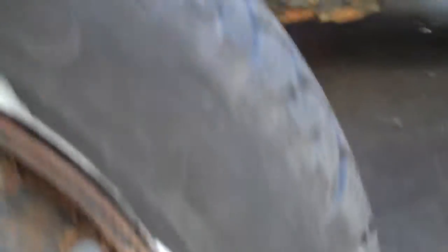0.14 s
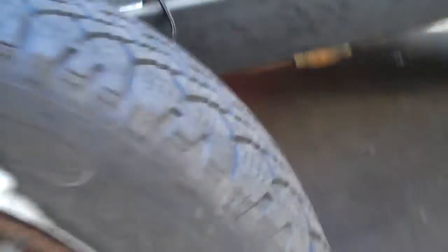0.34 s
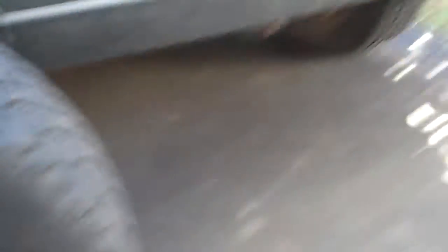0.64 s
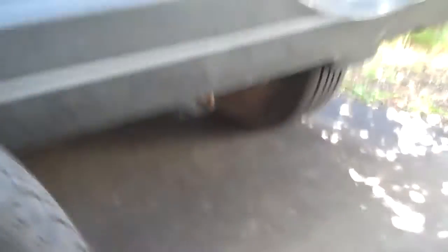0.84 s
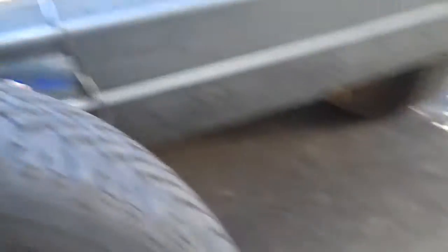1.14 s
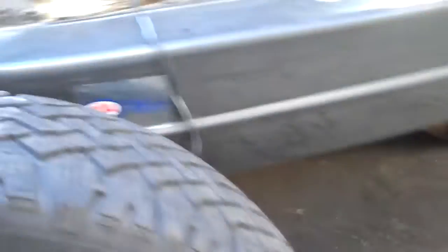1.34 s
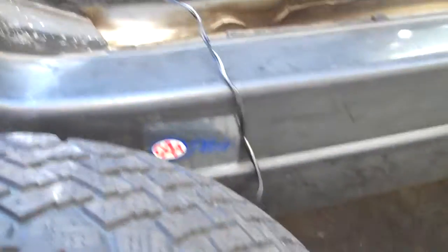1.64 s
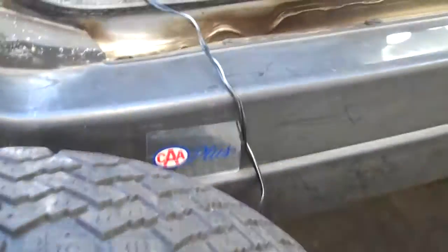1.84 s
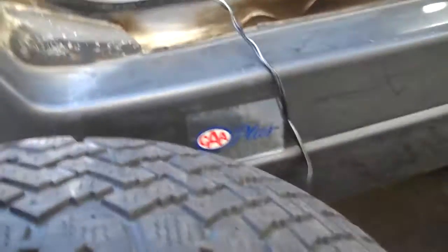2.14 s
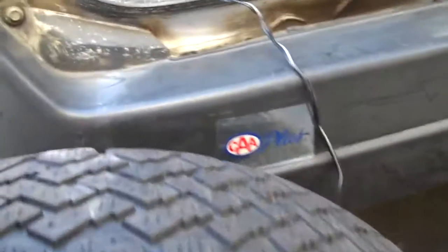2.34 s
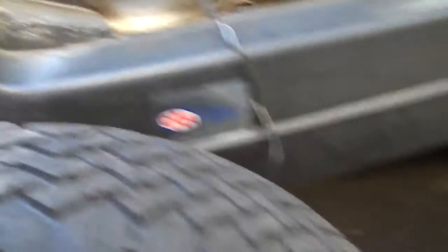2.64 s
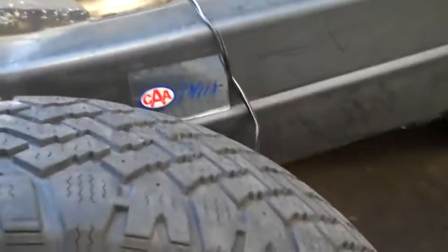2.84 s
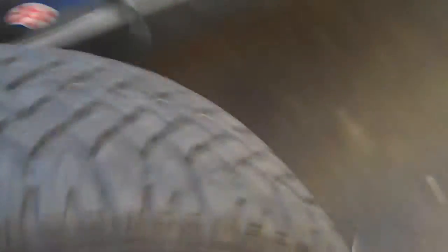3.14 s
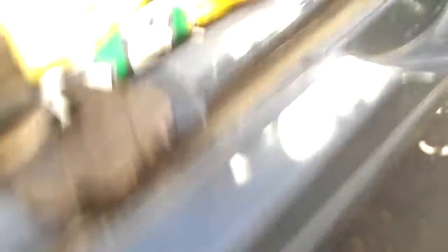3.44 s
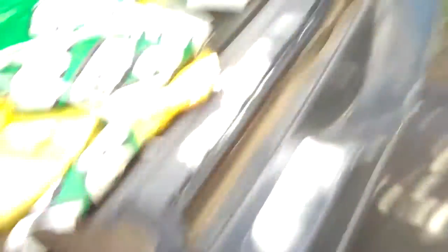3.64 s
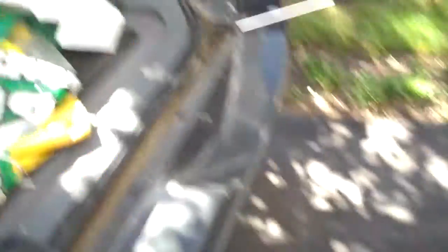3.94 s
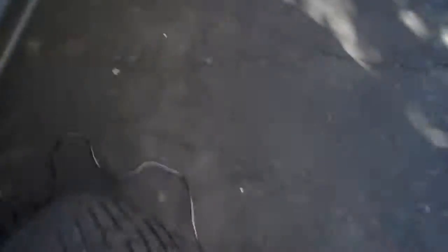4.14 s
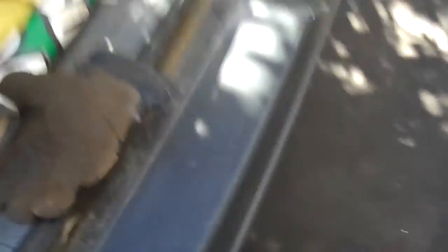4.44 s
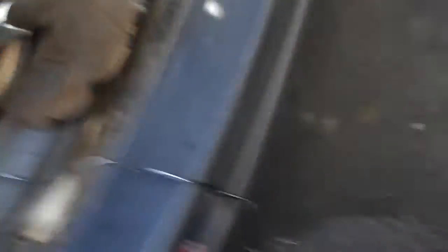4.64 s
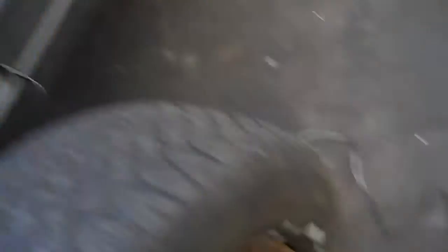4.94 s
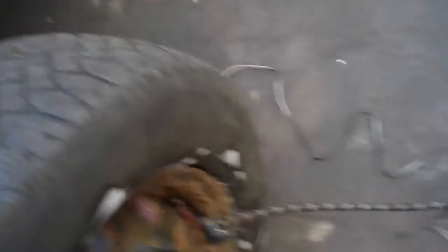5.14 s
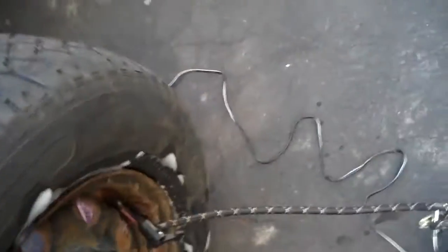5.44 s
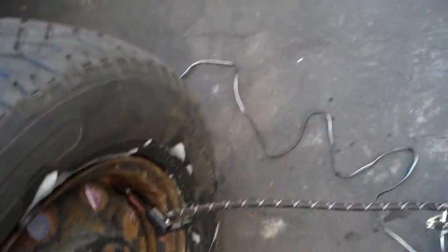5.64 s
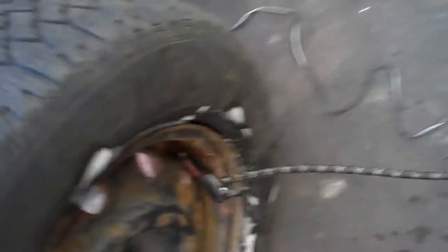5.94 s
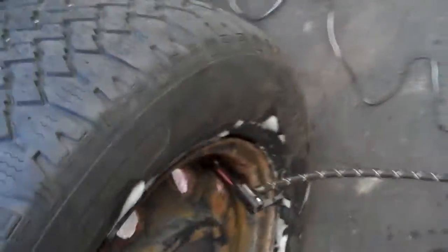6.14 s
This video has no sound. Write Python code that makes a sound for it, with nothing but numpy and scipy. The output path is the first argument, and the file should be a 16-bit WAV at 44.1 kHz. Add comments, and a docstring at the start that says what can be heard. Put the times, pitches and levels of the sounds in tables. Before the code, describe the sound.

A small electric piston compressor is already running at the start, pumping up a tire on the pavement beside a car, and it continues without a break for about six seconds. The piston knocks about 32 times a second, blending into a hard, chattering buzz. A bright, pulsing hiss of air runs with it, along with a metallic rattle, a faint rough whine and a low throb.

The microphone is close and hand-held, moving around the wheel, so these layers swell and fade while the overall loudness stays fairly even. Over the first 1.5 seconds the ring of the metal casing grows. After about 3 seconds the throb gives way to a deeper boom. Near 5 seconds the boom fades and the knocking and casing ring come forward again. The pump is still running at the end, just a touch slower.

```python
"""A small electric piston compressor pumps up a tyre beside a car, about 32 turns a second.
From the start, every turn brings a knock, two puffs of hissing air, a rattle and a throb of the cylinder.
The hand-held microphone wanders around the wheel, so the parts swell and fade and the ground echo shifts.
First the ring of the metal casing grows; after about 3 s the throb gives way to a deeper boom.
Near 5 s the boom fades and the knock and casing swell; the pump runs on to the end, a touch slower."""
import sys
import numpy as np
from scipy import signal
from scipy.fft import rfft, irfft, next_fast_len
from scipy.io import wavfile
from scipy.ndimage import uniform_filter1d, map_coordinates

SR = 44100
rng = np.random.default_rng(int(sys.argv[2]) if len(sys.argv) > 2 else 0)


def bounce(signal):
    """Save signal as a 16-bit WAV file at the path given by the first command-line argument."""
    frames = np.transpose(np.atleast_2d(signal))
    limited = np.clip(frames, -1, 1)
    pcm = np.round(limited * 32767).astype(np.int16)
    wavfile.write(sys.argv[1], SR, pcm)


N = 277830
TIME = np.arange(N) / SR
FFT_SIZE = next_fast_len(N + SR // 2)
HZ = np.maximum(np.fft.rfftfreq(FFT_SIZE, 1 / SR), 1)


# how fast the crank spins: t/s, speed/(turns per s)
CRANK_SPEED = [(0.0, 32.57), (0.5, 32.52), (1.0, 32.35), (2.0, 32.33), (3.0, 32.19), (4.0, 32.09),
               (5.0, 32.01), (5.8, 31.77), (6.3, 32.08)]
def crank(start_turn=.106):
    """The crank drives the piston. Counts its turns; a "place" is a point within one turn, 0 to 1."""
    return start_turn + np.cumsum(in_time(CRANK_SPEED)[0]) / SR


# the piston's knocks: place/turns, fade time/turns, level/dB
PISTON_KNOCKS = [(.11, 0.37, -4), (0.619, 0.026, -13)]
# the notes the cylinder head rings at: f/Hz, width/Hz, level/dB
HEAD_NOTES = [(1045, 130, -13.5), (1102, 85, 10.5), (1230, 14, 3)]
# the knock along the microphone's path: t/s, level/dB
KNOCK_LEVEL = [(0.0, -24), (0.39, -21), (0.57, -23.5), (0.9, -20), (1.47, -27.5), (1.83, -23.5),
               (2.19, -27), (2.43, -23.5), (2.94, -24.5), (3.06, -28), (3.33, -23.0), (3.872, -26.5),
               (4.83, -21), (4.98, -24.5), (5.88, -25.5), (6.3, -21.5)]
def knock(turns):
    """The piston knocks as it pushes against the air, and the cylinder head rings."""
    blows = contacts(turns, PISTON_KNOCKS, repeat=0.47, chatter_db=-2, jitter_ms=0.12, between=0.076)
    return gain_curve(KNOCK_LEVEL) * evened(band(resonate(blows, HEAD_NOTES), 1037, 1430))


# the two puffs through the valves: place/turns, fade time/turns, level/dB
AIR_JETS = [(.16, 0.47, -0.49), (.71, 0.5, -0.22)]
# the hiss from low to high pitch: f/Hz, level/dB
HISS_COLOUR = [(30, -43), (80, -28), (600, -25.5), (1500, 1), (2700, 2), (3050, -3), (3350, 0),
               (3650, -2.5), (4200, 1.5), (5000, 0), (5900, 2), (6800, -4.5), (7750, 1.5), (9300, -10),
               (11300, -20.5), (14000, -19)]
# the notes of the whistle: f/Hz, width/Hz, level/dB
WHISTLE_NOTES = [(4133, 130, 26), (6140, 390, -25.5)]
# the hiss along the microphone's path: t/s, level/dB
HISS_LEVEL = [(0.0, -21.5), (0.27, -20), (0.54, -23), (0.69, -20.5), (1.86, -20.5), (1.98, -21.0),
              (3.54, -21.0), (3.84, -19.5), (5.67, -20.5), (6.3, -19)]
def hiss(turns):
    """Air tears through the valves on both strokes and whistles faintly; left and right differ."""
    air = rng.standard_normal((2, N)) * bursts(turns, AIR_JETS, rise=0.017, between=0.45, uneven_db=1.4)
    rush, whistle = coloured(air, HISS_COLOUR), resonate(air, WHISTLE_NOTES)
    whistle_db = -22.5 + 1.1 * swing(CYLINDER_LEVEL)  # compared with the rush; swells with the boom
    shared, side = rush / rush.std() + from_db(whistle_db) * whistle / whistle.std()
    side = filtered(side, side_gain())
    return gain_curve(HISS_LEVEL) * np.array([swirled(shared + side), swirled(shared - side)])


# the jolts of the drive: place/turns, fade time/turns, level/dB
DRIVE_JOLTS = [(.26, 0.15, -10), (.71, 0.28, -10)]
# the notes the drive and its cover ring at: f/Hz, width/Hz, level/dB
DRIVE_NOTES = [(1830, 33, 6), (2049, 38, 6.5), (2115, 25, 6.5)]
COVER_NOTES = [(2286, 56, 10), (2660, 250, -7)]
# the drive's ring along the microphone's path: t/s, level/dB
RATTLE_LEVEL = [(0.0, -26.5), (0.33, -21.5), (0.54, -35), (0.84, -23), (1.47, -30.5), (1.95, -24.5),
                (2.55, -25.5), (2.94, -37), (3.12, -25), (3.3, -29), (4.05, -23), (4.32, -29),
                (5.04, -23.5), (5.88, -30), (6.12, -22), (6.3, -24)]
def rattle(turns):
    """The drive rattles whenever push turns to pull; it rings and shakes the thin cover."""
    blows = contacts(turns, DRIVE_JOLTS, repeat=1.0, chatter_db=-1.5, jitter_ms=0.052, between=0.048)
    ring = evened(band(resonate(blows, DRIVE_NOTES), 1940, 2250))
    cover = evened(band(resonate(blows, COVER_NOTES), 2204, 2620))
    cover_db = -29 + 0.23 * swing(RATTLE_LEVEL) - 0.52 * swing(HOUSING_LEVEL)
    return gain_curve(RATTLE_LEVEL) * ring + from_db(cover_db) * cover


# the blows on the casing: place/turns, fade time/turns, level/dB
CASING_BLOWS = [(.13, 0.24, 3.5), (0.701, 0.23, -1)]
# the notes the casing rings at: f/Hz, width/Hz, level/dB
CASING_NOTES = [(1659, 58, 0.5), (1734, 56, -2), (1764, 16, -2)]
# the casing along the microphone's path: t/s, level/dB
CASING_LEVEL = [(0.0, -42), (1.38, -23.5), (3.36, -28.5), (3.54, -34), (3.99, -27), (4.11, -34),
                (4.83, -23), (5.25, -25.0), (6.3, -26)]
def casing(turns):
    """The piston's strokes set the metal casing ringing."""
    blows = contacts(turns, CASING_BLOWS, repeat=0.6, chatter_db=-3, jitter_ms=0.072, between=.05)
    return gain_curve(CASING_LEVEL) * evened(band(resonate(blows, CASING_NOTES), 1430, 1950))


# the whine, dipping at both ends of the piston's travel: place/turns, f/Hz, level/dB
WHINE_PATH = [(0, 1772, 1), (.12, 1466, 1.5), (.21, 1142, -5), (.28, 1558, 7.5), (.36, 2170, -4),
              (.52, 1985, -2), (.68, 1230, -7), (.76, 2140, 2), (.87, 2300, -11)]
# the notes the gears ring at: f/Hz, width/Hz, level/dB
GEAR_NOTES = [(1080, 17, -5.5), (1447, 48, 10.5), (1590, 94, -4.5), (2160, 990, 0)]
def whine(turns, roughness=0.039):
    """A rough whine of the drive swoops down and up as the load comes and goes."""
    place, hz, db = np.transpose(WHINE_PATH)
    hz, db = np.interp(turns, place, hz, period=1), np.interp(turns, place, db, period=1)
    waver = uniform_filter1d(rng.standard_normal(N), size=120)
    phase = 2 * np.pi * np.cumsum(hz * (1 + roughness * waver / waver.std())) / SR
    phase -= phase[np.searchsorted(turns, np.floor(turns))]  # the same gear teeth meet on every turn
    whine_db = -28.5 - .35 * swing(KNOCK_LEVEL)  # louder where the knock is faint
    return from_db(whine_db) * evened(resonate(from_db(db) * np.sin(phase), GEAR_NOTES))


# the two strokes of the piston: place/turns, level/dB
STROKES = [(0.198, 2.5), (0.778, -7)]
# the throb from low to high pitch: f/(average crank speed), level/dB
THROB_COLOUR = [(1, -53), (2, -30.5), (3, -33.5), (4, -28), (5, -20.5), (6, -27), (7, -25), (8, -10.5),
                (9, -11.5), (10, 0.5), (11, -1), (12, 2.5), (13, 3.5), (14, 2.5), (15, -11), (16, -7)]
# a tiny swell in the breath of air: place/turns, fade time/turns, level/dB
BREATH_SWELL = [(.3, .3, -36)]
# the breath from low to high pitch: f/Hz, level/dB
BREATH_COLOUR = [(30, -83), (100, -24), (200, -15.5), (300, 3.5), (420, 12), (560, 3), (700, -18),
                 (1200, -49)]
def throb(turns, uneven=0.047, breath_db=-13):
    """A strong and a weak push of air pass through the pump's body each turn, over a soft breath."""
    pulses = 0
    for place, db in STROKES:
        count, age = np.divmod(turns - place + 1, 1)
        force = 1 + uneven * rng.standard_normal(256)
        pulses = pulses + from_db(db) * force[count.astype(int)] * np.exp(-(age * 400 - 2) ** 2)
    crank_hz = np.mean(np.array(CRANK_SPEED)[:, 1])
    overtones = [(multiple * crank_hz, db) for multiple, db in THROB_COLOUR]
    tone = coloured(pulses, [(10, -65)] + overtones + [(650, -24.0), (1500, -61.5)])
    air = rng.standard_normal(N) * bursts(turns, BREATH_SWELL, rise=.05, between=.5, uneven_db=4)
    return evened(tone) + from_db(breath_db) * evened(coloured(air, BREATH_COLOUR))


# the cylinder along the microphone's path: t/s, boom level/dB, throb level/dB
CYLINDER_LEVEL = [(0.0, -39, -29.5), (1.5, -43.5, -28.5), (2.85, -41.5, -28.5), (3.15, -37.0, -39.5),
                  (3.69, -34.0, -33), (4.44, -35.5, -36.0), (4.8, -41, -32.5), (5.52, -44, -33),
                  (6.3, -40.5, -28.5)]
def cylinder(turns, hum_db=-45.5, hum_top_hz=275, boom_top_hz=368):
    """The cylinder's low hum spreads evenly; the boom and throb above it are loud in different spots."""
    boom_db, throb_db = in_time(CYLINDER_LEVEL)
    pulses = smeared(throb(turns), hz=465.7, width_hz=19.3)
    hum_range = 1 / (1 + (HZ / hum_top_hz) ** 30)
    low_range = 1 / (1 + (HZ / boom_top_hz) ** 40)
    hum = from_db(hum_db) * evened(filtered(pulses, hum_range))
    boom = from_db(boom_db) * evened(filtered(pulses, low_range - hum_range))
    return hum + boom + from_db(throb_db) * evened(filtered(pulses, 1 - low_range))


# the blows on the housing: place/turns, fade time/turns, level/dB
HOUSING_BLOWS = [(.07, 0.14, -2), (0.239, 0.05, -5.5), (0.619, 0.34, -9)]
# the notes the housing drones at: f/Hz, width/Hz, level/dB
HOUSING_NOTES = [(553, 53, -5), (577.7, 28, 1), (685, 154, -10.5), (758, 44, -2), (847, 48, -2.5),
                 (905, 18, -9.5)]
# the drone along the microphone's path: t/s, level/dB
HOUSING_LEVEL = [(0.0, -33.5), (1.68, -29), (3.15, -32), (3.57, -29.5), (4.77, -31.0), (5.16, -36.5),
                 (5.7, -33.5), (6.3, -31.5)]
def housing(turns):
    """The hollow housing drones under the strokes."""
    blows = contacts(turns, HOUSING_BLOWS, repeat=0.25, chatter_db=1.5, jitter_ms=0.067, between=0.71)
    drone = band(resonate(blows, HOUSING_NOTES), 508, 860)
    return gain_curve(HOUSING_LEVEL) * evened(ground_echo(drone))


# the echo off the ground: t/s, delay/ms, strength (0 to 1)
GROUND_ECHO = [(0, 1.3, 0), (.8, 0.73, 0.62), (1.2, 0.63, 0.74), (2.8, 0.55, 0.6), (3.25, 0.77, 0.45),
               (4.35, 1.15, 0.45), (4.85, 0.92, 0.52), (5.7, 0.69, 0.87), (6.3, 0.94, 0.2)]
def ground_echo(x):
    """The echo off the concrete cancels some pitches; which ones shifts as the microphone moves."""
    delay_ms, strength = in_time(GROUND_ECHO)
    return x + strength * np.interp(TIME - delay_ms / 1000, TIME, x)


def swirled(x, strength=0.34, sway_ms=.15, count=3):
    """Echoes off the car change their paths as the hand moves, so the tone drifts."""
    out = x
    for delay_ms in np.geomspace(1.2, 4.5, count):
        path_ms = delay_ms + sway_ms * np.interp(TIME, np.arange(8), rng.standard_normal(8))
        out = out + strength * x[np.arange(N) - np.abs(path_ms * SR / 1000).astype(int)]
    return out / np.sqrt(1 + count * strength ** 2)


def scattered(x, fade_s=0.004):
    """Short echoes off car and wheel reach left and right unequally."""
    echoes = rng.standard_normal(N) * np.exp(-np.minimum(TIME / fade_s, 50))
    side = filtered(x, rfft(echoes / np.linalg.norm(echoes), FFT_SIZE) * side_gain())
    return x + side * [[1], [-1]]


# how alike left and right sound: f/Hz, likeness (0 to 1)
LIKENESS = [(30, .7), (60, 0.68), (150, 0.93), (300, 1), (700, 0.93), (1200, 0.87), (2200, 0.75),
            (4000, 0.82), (8000, 0.094), (14000, 0.066)]
def side_gain():
    """Strength at each pitch of the "side", the part added on the left and taken away on the right."""
    alike = np.clip(over_hz(LIKENESS), 0, 1)
    return np.sqrt((1 - alike) / (1 + alike))


def contacts(turns, table, repeat, chatter_db, jitter_ms, between):
    """Each time two parts hit, there is a click and then a short spell of chatter."""
    tail = chatter(turns, repeat) * bursts(turns, table, rise=0.06, between=between, uneven_db=2.2)
    return strikes(turns, table, jitter_ms) + from_db(chatter_db) * tail / tail.std()


def strikes(turns, table, jitter_ms, uneven_db=1.0):
    """A sharp click at each listed place of the turn, never quite on time."""
    clicks = np.zeros(N)
    for place, _, db in table:
        late, force = rng.standard_normal((int(turns[-1]) + 1, 2)).T
        due = np.interp(np.arange(len(late)) + place, turns, np.arange(N), left=-SR, right=-SR)
        at = np.round(due + late * jitter_ms * SR / 1000).astype(int)
        heard = (at >= 0) & (at < N)
        clicks[at[heard]] += from_db(db + uneven_db * force[heard])
    return clicks / clicks.std()


def chatter(turns, repeat, memory=0.974, points_per_turn=1400):
    """Fine noise of touching parts: the share `repeat` returns each turn, slowly changing."""
    noise = rng.standard_normal((int(turns[-1]) + 2, points_per_turn))
    renewal = np.sqrt(1 - memory ** 2)
    pattern, _ = signal.lfilter([renewal], [1, -memory], noise[1:], axis=0, zi=memory * noise[:1])
    again = map_coordinates(pattern.ravel(), [turns * points_per_turn], order=1)
    return np.sqrt(repeat) * again / again.std() + np.sqrt(1 - repeat) * rng.standard_normal(N)


def bursts(turns, table, rise, between, uneven_db):
    """Loudness of bursts that return each turn with uneven force, over the steady level `between`."""
    power = between ** 2
    for place, fade, db in table:
        count, age = np.divmod(turns - place + 1, 1)
        force = from_db(db + uneven_db * rng.standard_normal(256))
        power = power + (force[count.astype(int)] * (1 - np.exp(-age / rise)) * np.exp(-age / fade)) ** 2
    return np.sqrt(power)


def flutter(depth_db=1.22, per_s=8.6):
    """The clatter grows and slackens by chance every few turns."""
    return from_db(depth_db * np.interp(TIME * per_s, np.arange(256), rng.standard_normal(256)))


def resonate(x, notes):
    """Rings a part at all its notes, every second one upside down; narrow notes ring longer."""
    out = 0
    for k, (hz, width, db) in enumerate(notes):
        r = np.exp(-np.pi * width / SR)
        gain = (-1) ** k * from_db(db) * (1 - r * r) / 2
        out = out + signal.lfilter([gain, 0, -gain], [1, -2 * r * np.cos(2 * np.pi * hz / SR), r * r], x)
    return out


def smeared(x, hz, width_hz):
    """A hollow part delays the sound near its own pitch a little, without changing its strength."""
    r = np.exp(-np.pi * width_hz / SR)
    feedback = [1, -2 * r * np.cos(2 * np.pi * hz / SR), r * r]
    return signal.lfilter(feedback[::-1], feedback, x)


def coloured(x, colour):
    """Makes each pitch as strong as the table says, with no ringing ahead of a hit (minimum phase)."""
    cepstrum = irfft(np.log(from_db(over_hz(colour))), FFT_SIZE)
    forward_half = cepstrum[:FFT_SIZE // 2] * (np.arange(FFT_SIZE // 2) > 0)
    return filtered(x, np.exp(2 * rfft(forward_half, FFT_SIZE)))


def band(x, low_hz, high_hz):
    """Softens everything outside a range of pitches."""
    return signal.sosfilt(signal.butter(2, [low_hz, high_hz], "band", fs=SR, output="sos"), x)


def filtered(x, response):
    """Multiplies each frequency by its own gain."""
    return irfft(rfft(x, FFT_SIZE) * response, FFT_SIZE)[..., :N]


def evened(x):
    """Holds the strength, averaged over about two turns, at 1."""
    return x / np.sqrt(uniform_filter1d(x * x, SR // 16) + 1e-20)


def from_db(db):
    """Turns decibels into a gain, the number to multiply a sound by."""
    return 10 ** (np.asarray(db) / 20)


def in_time(table):
    """Reads each column of a time table at every sample."""
    seconds, *columns = np.transpose(table)
    return [np.interp(TIME, seconds, column) for column in columns]


def gain_curve(table):
    """Reads a level table as a gain at every sample."""
    return from_db(in_time(table)[0])


def swing(table):
    """How many dB a table's first level stands above its average, at every sample."""
    level_db = in_time(table)[0]
    return level_db - level_db.mean()


def over_hz(table):
    """Reads a table at every frequency, with octaves evenly spaced."""
    hz, value = np.transpose(table)
    return np.interp(np.log(HZ), np.log(hz), value)


def scene():
    """One crank drives every part; where the microphone is sets their mix."""
    turns = crank()
    pump = cylinder(turns) + housing(turns)
    for part in (knock, whine, casing, rattle):
        pump += part(turns) * flutter()
    return scattered(pump) + hiss(turns)


# how much later the left side hears the pump: t/s, delay/samples
LEFT_LAG = [(0, .1), (.8, 0.42), (1.7, 1.5), (3.2, 2.25), (6.3, 2.84)]
# how much louder the left side is than the right: f/Hz, level/dB
LEFT_BALANCE = [(100, -1.5), (2500, -3.5), (3600, -3.5), (4800, -3.5), (5800, -16.5), (6700, 5), (7600, 13),
                (9500, 9), (11000, 10.5), (14000, 21.5)]
def record(dry, cutoff_hz=14200):
    """The microphone has two unequal openings, the right one a bit nearer; the highest treble is cut."""
    late_left = map_coordinates(dry[0], [np.arange(N) - in_time(LEFT_LAG)[0]], order=3)
    left = from_db(over_hz(LEFT_BALANCE))
    balance = np.array([left, np.ones_like(left)]) / np.sqrt((1 + left ** 2) / 2)
    treble_cut = 1 / np.sqrt(1 + (HZ / cutoff_hz) ** 800)
    return filtered(np.array([late_left, dry[1]]), balance * treble_cut)


dry = scene()
out = record(dry)
bounce(out)
```